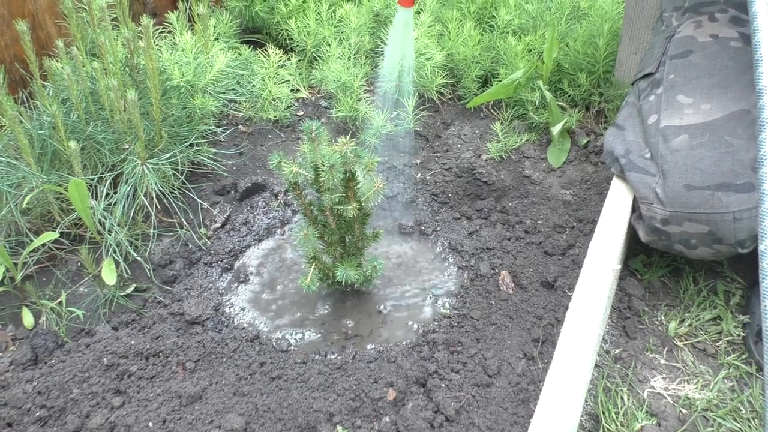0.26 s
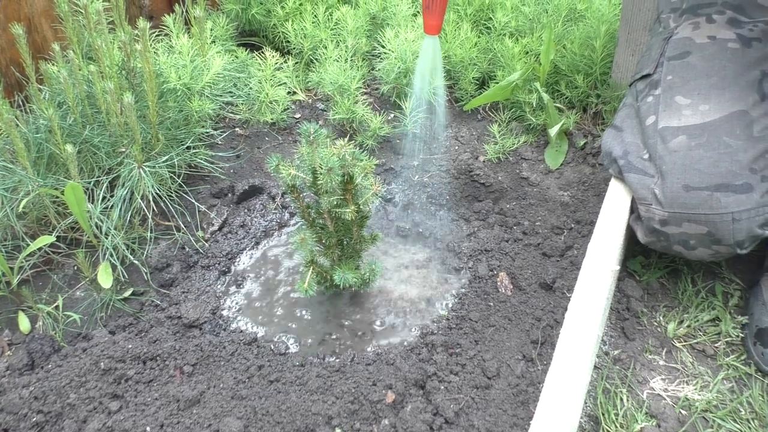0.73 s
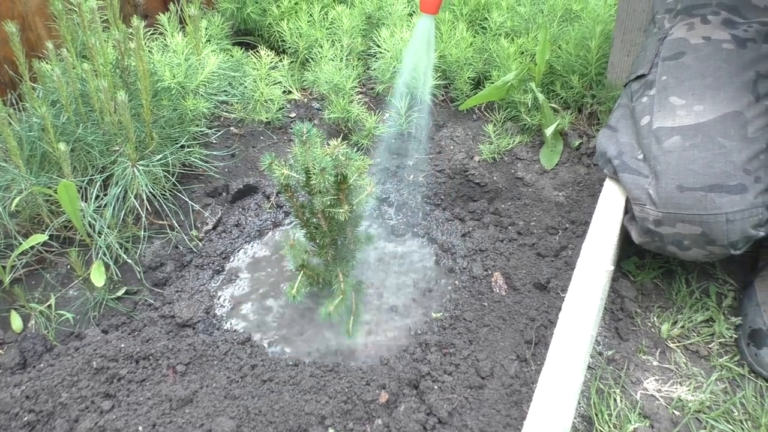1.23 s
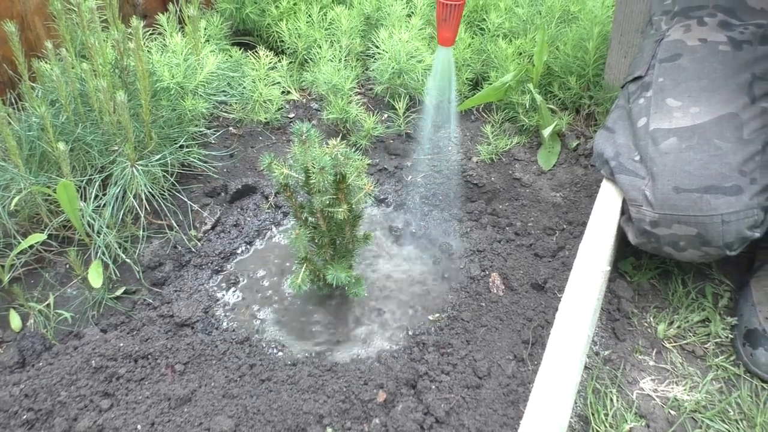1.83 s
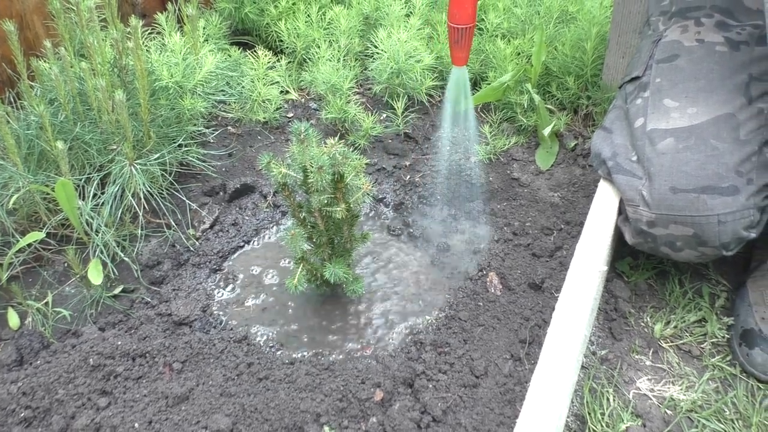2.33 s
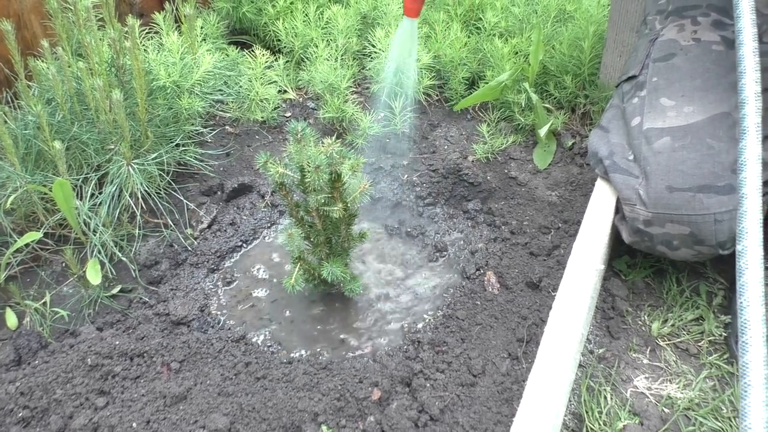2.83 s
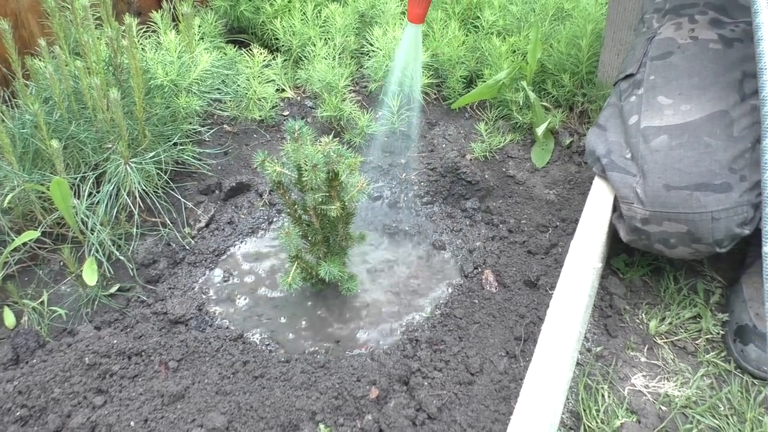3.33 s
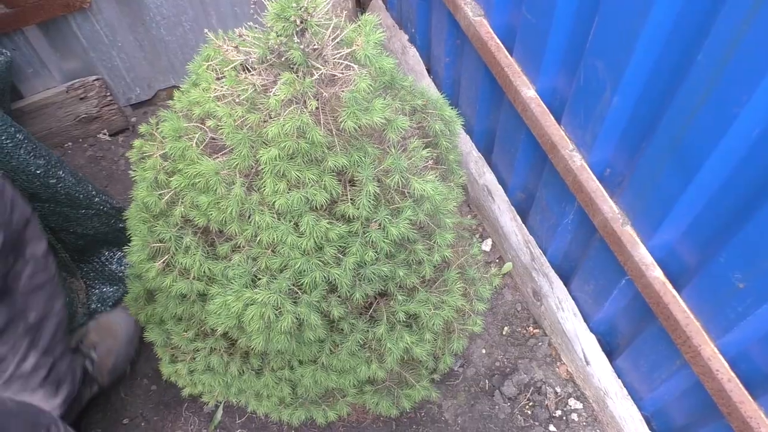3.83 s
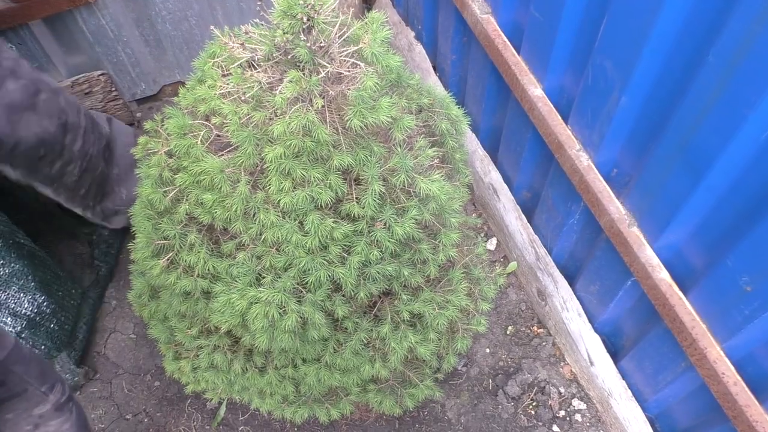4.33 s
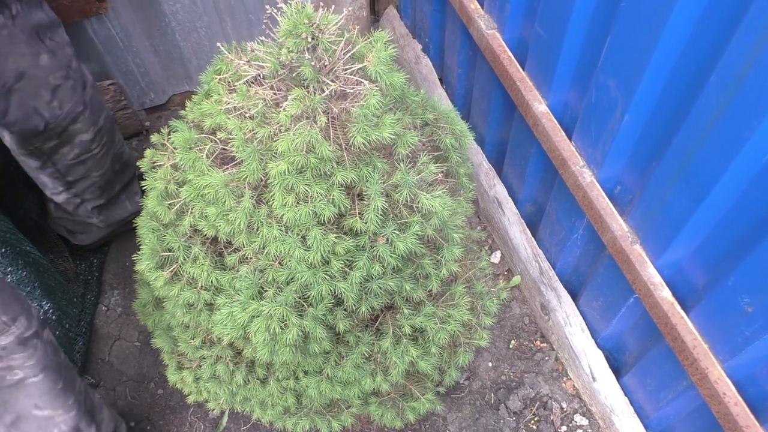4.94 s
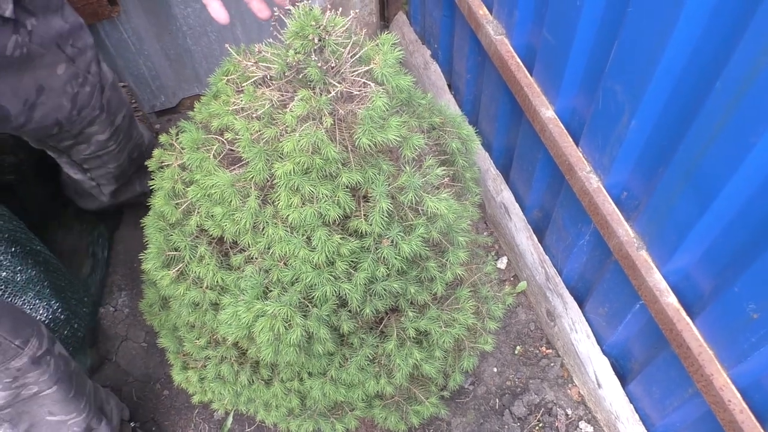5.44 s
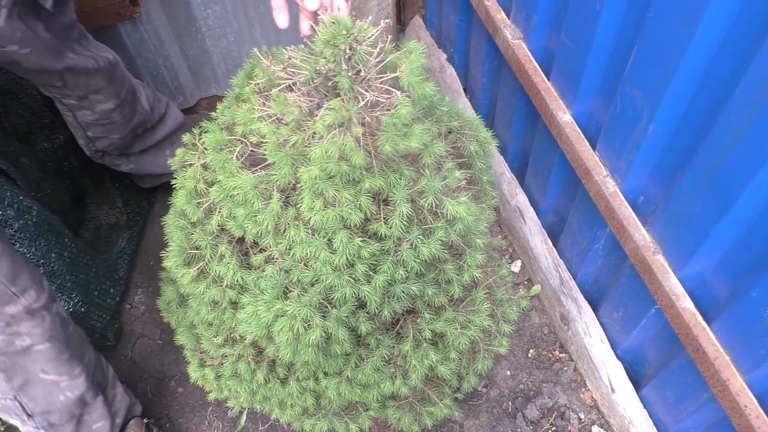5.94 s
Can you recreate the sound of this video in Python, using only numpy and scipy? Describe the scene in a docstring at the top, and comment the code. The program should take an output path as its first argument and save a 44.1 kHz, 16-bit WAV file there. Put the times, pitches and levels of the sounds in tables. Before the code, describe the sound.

Loud close water spray fizzing in a puddle stops dead, giving way to faint garden murmur, dull footfalls, twig snaps and thin bird calls.

```python
"""A hose sprays a seedling: impact noise of fine drops hisses, damped bubbles fizz in a puddle and patter on wet soil.
At 3.5 s this cuts abruptly to a quiet corner by a fence, where a murmur of filtered noise and a far drone swell up.
Soft low thuds are someone's steps round a small spruce; then random grains rustle as cloth, needles and soles,
damped tones snap as twigs, and a small bird whistles gliding sines with a scattered tail.
A second bird, much further off, is heard as two narrow bands of noise."""
import sys
import numpy as np
from scipy import signal
from scipy.fft import rfft, irfft, next_fast_len
from scipy.io import wavfile
from scipy.ndimage import map_coordinates

SR = 44100
rng = np.random.default_rng(int(sys.argv[2]) if len(sys.argv) > 2 else 0)


def int16_out(signal):
    """Quantize to a 16-bit WAV file."""
    q = np.round(np.clip(np.atleast_2d(signal).T, -1, 1) * 32767)
    wavfile.write(sys.argv[1], SR, q.astype(np.int16))


N = 272538
TIME = np.arange(N) / SR   # s
SCENE_CHANGE_S, FADE_S = 3.492, 0.003   # start and time constant of the crossfade

# The wandering spray. Each row: time in seconds, level of the drops' hiss in dB before DROPS_DB,
# aim at the puddle as bubbling against hiss in dB before PUDDLE_FOLLOWS_AIM.
SPRAY = [(0.0, -22.5, -5.5), (0.02, -24, -8), (0.03, -22, -8), (0.08, -20.5, -2.5), (0.09, -23.5, -4),
         (0.42, -21.5, 0), (0.53, -19.5, -2), (0.65, -21, -1), (0.88, -19, -1.5), (0.94, -21.5, -1.5),
         (1.09, -19, -1), (1.15, -20, 0), (1.31, -18, -3), (1.38, -22.5, -1.5), (1.6, -20, -3),
         (1.74, -20, 0), (2.45, -21, -7), (2.5, -20, -3.5), (2.84, -20.5, -0.5), (3.18, -19, -2),
         (3.23, -21, 0), (3.4, -18.5, -1.5), (3.48, -20.5, 0)]
# Patter of the share that falls on bare soil. Each row: time in seconds, level in dB before SOIL_DB.
SOIL_LEVEL = [(0.03, -42.5), (0.04, -43), (0.4, -39), (1.07, -44.5), (1.19, -42.5), (1.4, -48.5),
              (2.09, -41), (3.25, -38), (3.36, -47), (3.48, -44.5)]
DROPS_DB, PUDDLE_DB, SOIL_DB = 2.5, -0.16, 3   # added to the levels above
PUDDLE_FOLLOWS_AIM = 1.47   # dB of bubbles per dB of aim
# Single fat drops. Each row: start in seconds, bubble level in dB, bubble pitch in Hz,
# splash against the bubble in dB.
FAT_DROPS = [(0.9136, -1, 5360, -16), (1.2304, -5, 3170, -16), (1.5450, -5, 9850, -17),
             (2.1299, -6.5, 3260, -17), (2.1387, -2, 8500, -8), (3.1730, -7, 2610, -10)]
# Filter shapes of the water sounds. Each row: frequency in Hz, relative gain in dB.
HISS = [(760, -39.5), (1300, -9), (2670, -4), (3850, -4.5), (4190, -2.5), (4650, -4), (5670, -3),
        (7220, -3), (11300, 1.5), (12800, -5.5), (15000, -5), (15800, -10)]
PUDDLE = [(590, -37), (1000, -12.5), (1270, -8.5), (1940, 0), (4280, -0.5), (5500, -10.5), (7150, -25),
          (12100, -120)]
SOIL = [(160, -33), (280, -21), (310, -13.5), (408, -5.5), (486, 0), (1030, -2.5), (1400, -10.5),
        (1820, -21), (3080, -120)]
HOSE_RUMBLE = [(24, -55), (40, -22), (75, -17), (113, -9.5), (216, -1.5), (273, -3), (312, -3), (380, -5),
               (490, -30), (840, -120)]
HOSE_RUMBLE_DB = -47.5
# Stereo width of the spray. Each row: frequency in Hz, side against middle in dB.
SPRAY_WIDTH = [(60, 0), (99, -13), (160, -4), (270, -10.5), (450, -5.5), (740, -11.5), (1220, -10.5),
               (2010, -17), (3330, -10), (5500, -15), (9080, -24), (15000, -80)]
# Stereo balance of the spray. Each row: frequency in Hz, gain of left over right in dB.
SPRAY_BALANCE = [(60, 1), (99, 4), (160, 7.5), (270, 4.5), (450, 1.5), (740, -3), (1220, -2.5),
                 (2010, -1.5), (3330, -3), (5500, 1), (9080, -2), (15000, -14.5)]
# The low splashing reaches the left side later. Each row: frequency in Hz, phase lead of the left in radians.
SPRAY_LEAD = [(100, -0.2), (260, -0.96), (520, -0.74), (860, -0.14), (1550, 0.16)]

# Soft footfalls and knocks. Each row: start in seconds, level in dB, pitch in Hz.
THUDS = [(3.512, -35, 171), (3.582, -35, 126), (3.697, -29, 185), (3.937, -24.5, 192), (4.035, -27, 177),
         (4.165, -31.5, 205), (4.305, -33, 235), (4.331, -25.5, 176), (4.383, -22, 258),
         (4.430, -29.5, 190), (4.658, -34, 170), (4.678, -35.5, 115), (4.88, -35, 144), (4.949, -38, 95)]
REBOUND_S, REBOUND_DB = 0.0205, -11   # the sole settles after each thud: delay, level against the thud
SHUFFLE_DB, SHUFFLE_S = -23, 0.042   # the weight shifts: level against the step, time to its peak
# Strokes of cloth as the person moves. Each row: peak time in seconds, rise time constant in seconds, level in dB.
SWISHES = [(4.16, 0.14, -42), (4.36, 0.05, -46.5), (4.53, 0.061, -42), (5.06, 0.015, -32.5),
           (5.53, 0.065, -43), (5.64, 0.11, -38.5), (5.81, 0.07, -47), (6.0, 0.017, -47.5),
           (6.09, 0.035, -45)]
# A sleeve brushes through the needles. Each row: peak time in seconds, rise time constant in seconds, level in dB.
BRUSHES = [(4.13, 0.074, -42.5), (5.14, 0.35, -41), (5.64, 0.16, -44.5)]
SWISH_FALL, BRUSH_FALL = 0.52, 1.13   # fall time as a share of the rise
CLOTH_REST_DB, NEEDLES_REST_DB = -58, -54.5   # faint stirring between strokes
# Shoe scuffs. Each row: start in seconds, attack in seconds, time from start to release in seconds, level in dB.
SCUFFS = [(4.48, 0.02, 0.058, -36.5), (5.042, 0.004, 0.027, -29.5)]
SCUFF_RELEASE_S = 0.012
# Twigs and grit snapping. Each row: start in seconds, tone level in dB, pitch in Hz, crack against the tone in dB.
SNAPS = [(4.260, -28, 10500, -14), (4.324, -33, 8500, -6), (5.0728, -13.5, 5160, -13.5),
         (5.3074, -28, 4200, -12), (5.3683, -21, 1770, -25), (5.372, -28, 1890, -22),
         (5.4037, -25, 2490, -15), (5.928, -34, 9000, -5)]
# Filter shapes of the rustling. Each row: frequency in Hz, relative gain in dB.
CLOTH = [(2590, -14), (4400, -2), (4690, -4), (6640, -4), (11300, 0), (15100, -5.5), (15800, -16)]
NEEDLES = [(760, -28), (1300, 0.5), (1440, -1), (1770, 2.5), (2250, 0.5), (2740, 0.5), (7000, -14.5),
           (9100, -52), (15400, -120)]
SCUFF = [(240, -40), (400, -1.5), (812, -6), (1010, 2), (1390, -0.5), (2140, -6), (3550, -8.5),
         (4080, -9.5), (10800, -25), (15800, -21)]

# The bird repeats a falling low note, a high note and a weak afternote. Each row: start of the high note in seconds,
# high note level in dB, low note level in dB, afternote level in dB.
BIRD_CALLS = [(4.143, -49, -58, -57), (4.596, -47.5, -54, -50), (5.064, -38, -46, -47),
              (5.526, -47, -51.5, -46), (5.975, -40, -45, -45.5)]
HIGH_HZ, AFTER_HZ, LOW_HZ = 3875, 3905, 3270   # held pitches
HIGH_S, AFTER_S, LOW_S = 0.066, 0.05, 0.06   # note lengths
AFTER_LAG_S, LOW_LEAD_S = 0.0637, 0.17   # timing against the high note
ONSET_HZ, ONSET_PULL = 3770, 0.6   # each note starts pulled this share of the way towards one pitch
BIRD_LAG_S = 0.000045   # the song reaches the right side later
# The far bird, blurred by echoes. Each row: start in seconds, length in seconds, level in dB before its octave.
FAR_BIRD = [(4.76, 0.13, -55), (5.08, 0.24, -51.5)]
FAR_BIRD_HZ, FAR_OCTAVE_DB = 2730, -6   # pitch, level of the octave against it
# A far engine's drone, before the murmur's swell. Each row: centre in Hz, bandwidth in Hz, level in dB.
DRONE = [(86, 5, -52.5), (208, 20, -50), (410, 51, -55.5)]
# Filter shape of the murmur. Each row: frequency in Hz, relative gain in dB.
MURMUR = [(24, -36), (40, -23), (75, -4.5), (209, 0), (327, -2.5), (400, 2.5), (676, -3.5), (1290, 0),
          (2190, -12), (2740, -12.5), (3030, -14), (3350, -13.5), (4520, -18.5), (5390, -19.5),
          (15800, -25)]
MURMUR_DB = -35.0   # once settled
MURMUR_START_DB, MURMUR_SETTLE_S = -10.5, 1.52   # start against the settled level, time constant
# Stereo width of the quiet corner. Each row: frequency in Hz, side against middle in dB.
GARDEN_WIDTH = [(60, -6), (110, -12), (200, -7.5), (380, -8.5), (700, -9.5), (1290, -6), (2380, -7),
                (4400, -5.5), (8120, -22), (15000, -24)]
# Stereo balance of the quiet corner. Each row: frequency in Hz, gain of left over right in dB.
GARDEN_BALANCE = [(60, -1), (110, 1), (200, 1), (380, -1.5), (700, -4.5), (1290, -5), (2380, -1.5),
                  (4400, -0.5), (8120, 0), (15000, 4)]

MERGE_HZ, CUTOFF_HZ = 6900, 15850   # stereo difference and whole sound end here
PEAK_LIMIT = 1.1   # ceiling of the rounded peaks


def hose():
    """Superposition: the spray wanders between puddle and soil, and one flutter modulates hiss and bubbles together."""
    drops_db, aim_db = in_time(SPRAY)
    soil_db, = in_time(SOIL_LEVEL)
    puddle_db = drops_db + PUDDLE_FOLLOWS_AIM * aim_db
    flutter = drift(45)
    drops = [fine_drops(per_s=7000, size_db=3.0, decay_s=0.00078, burst_db=2.5, steady_db=-4.5)
             for _ in range(2)]
    hiss = spread(drops, HISS, SPRAY_WIDTH)
    # most bubbles burst at once, a few ring on as tiny plinks
    fizz = [bubbles(per_s=8000, size_db=2.5, low_hz=877, high_hz=7270, cycles=7.8) for _ in range(2)]
    plinks = [bubbles(per_s=450, size_db=2.0, low_hz=1080, high_hz=4200, cycles=50, count=40)
              for _ in range(2)]
    puddle = spread(np.array(fizz) + from_db(-9.5) * np.array(plinks), PUDDLE, SPRAY_WIDTH)
    patter = [bubbles(per_s=1800, size_db=2.0, low_hz=255, high_hz=1636, cycles=13.5) for _ in range(2)]
    soil = spread(patter, SOIL, SPRAY_WIDTH)
    rumble = from_db(HOSE_RUMBLE_DB) * spread(rng.standard_normal((2, N)), HOSE_RUMBLE, SPRAY_WIDTH)

    water = hiss * from_db(drops_db + DROPS_DB + 0.28 * flutter)
    water += puddle * from_db(puddle_db + PUDDLE_DB + 0.62 * flutter + 0.11 * drift(60))
    water += soil * from_db(soil_db + SOIL_DB + 0.14 * flutter)
    water += pings(FAT_DROPS, cycles=18, crack_s=.001)
    # drops are too small for bass
    water = signal.sosfilt(signal.butter(2, 250, "high", fs=SR, output="sos"), water)
    return turned(placed(water + rumble, SPRAY_BALANCE), SPRAY_LEAD)


def fine_drops(per_s, size_db, decay_s, burst_db, steady_db):
    """Impact noise: each drop ticks, with a short burst of noise that rises and falls; steady noise fills in beneath."""
    ticks = grains(per_s, size_db)
    r = np.exp(-1 / (decay_s * SR))
    burst_power = np.abs(signal.lfilter([1], [1, -2 * r, r * r], ticks ** 2))
    bursts = np.sqrt(burst_power) * rng.standard_normal(N)
    steady = rng.standard_normal(N)
    return rms_one(rms_one(ticks) + from_db(burst_db) * rms_one(bursts) + from_db(steady_db) * steady)


def bubbles(per_s, size_db, low_hz, high_hz, cycles, count=28):
    """Damped resonance: trapped bubbles of many sizes each ring for a few cycles, weighted by pitch."""
    born = grains(per_s, size_db)
    dealt = rng.integers(0, count, N)   # which size each bubble has
    pitches = np.geomspace(low_hz, high_hz, count)
    return rms_one(sum(hz * ring(born * (dealt == k), hz, cycles / hz) for k, hz in enumerate(pitches)))


def footfalls(swell_cycles, grit_db, grit_s):
    """Heavy damping: soft ground answers a step with a few low cycles and a weak rebound, in a crunch and shuffle."""
    out = np.zeros(N)
    crunch = band_noise(80, 380)
    shuffle = band_noise(70, 220)
    for s, db, hz in THUDS:
        thud, rebound = (swell(at, swell_cycles / hz) * np.sin(2 * np.pi * hz * (TIME - at))
                         for at in (s, s + REBOUND_S))
        ground = from_db(grit_db) * crunch * swell(s - grit_s, grit_s)
        ground += from_db(SHUFFLE_DB) * shuffle * swell(s, SHUFFLE_S)
        out += from_db(db) * (thud + from_db(REBOUND_DB) * rebound + ground)
    return out


def clothes():
    """Friction noise: dense fibre impacts swish with each stroke of the cloth."""
    swishing = np.hypot(strokes(SWISHES, SWISH_FALL), from_db(CLOTH_REST_DB)) * from_db(0.9 * drift(50))
    return swishing * rustle(11000, 3.0, CLOTH)


def needles():
    """Sparse impacts: needles crackle one by one as the sleeve brushes them."""
    brushing = np.hypot(strokes(BRUSHES, BRUSH_FALL), from_db(NEEDLES_REST_DB))
    return brushing * rustle(3500, 2.5, NEEDLES)


def scuffs():
    """Sliding friction: grains sound under the pressure of a sole, which trembles quickly."""
    pressure = np.zeros(N)
    for s, attack, length, db in SCUFFS:
        release = np.exp(-np.maximum(TIME - s - length, 0) / SCUFF_RELEASE_S)
        pressure += from_db(db) * np.clip((TIME - s) / attack, 0, 1) * release
    return pressure * from_db(2.1 * drift(270)) * rustle(7000, 2.0, SCUFF)


def bird(slide_s, waver_hz, echo_db, echo_s):
    """Frequency glide: thin whistles slide on to a held pitch, with a tail scattered by fences and trees."""
    song = np.zeros(N)
    waver = waver_hz * drift(120)
    for call_s, high_db, low_db, after_db in BIRD_CALLS:
        notes = [(call_s - LOW_LEAD_S, LOW_S, LOW_HZ, low_db),
                 (call_s, HIGH_S, HIGH_HZ, high_db),
                 (call_s + AFTER_LAG_S, AFTER_S, AFTER_HZ, after_db)]
        for s, length, held_hz, db in notes:
            slide = np.exp(-np.maximum(TIME - s, 0) / slide_s)
            hz = held_hz + ONSET_PULL * (ONSET_HZ - held_hz) * slide + waver
            whistle = np.sqrt(2) * np.sin(2 * np.pi * np.cumsum(hz) / SR)
            song += from_db(db) * burst(s, length, edge=0.01) * whistle
    tail = rng.standard_normal((2, SR // 2)) * np.exp(-TIME[:SR // 2] / echo_s)
    echoes = signal.fftconvolve(song[None], tail / np.linalg.norm(tail[0]), axes=1)[:, :N]
    return np.array([song, np.interp(TIME - BIRD_LAG_S, TIME, song)]) + from_db(echo_db) * echoes


def far_bird(width_hz):
    """Multipath smearing: distance blurs each whistle and its octave into narrow bands."""
    tone, octave = (drift(width_hz) * np.sqrt(2) * np.sin(2 * np.pi * k * FAR_BIRD_HZ * TIME) for k in (1, 2))
    calls = sum(from_db(db) * burst(s, length, edge=0.037) for s, length, db in FAR_BIRD)
    return (tone + from_db(FAR_OCTAVE_DB) * octave) * calls


def drone():
    """Resonance: noise drives a few narrow modes, as of a far engine."""
    return sum(from_db(db) * rms_one(ring(rng.standard_normal(N), hz, np.log(1000) / (np.pi * width)))
               for hz, width, db in DRONE)


def murmur():
    """Sum of many distant sources: Gaussian noise with a fixed spectrum."""
    return from_db(MURMUR_DB) * spread(rng.standard_normal((2, N)), MURMUR, GARDEN_WIDTH)


def garden():
    """Superposition: a moving person and two birds over a murmur and drone that swell together."""
    person = footfalls(swell_cycles=0.88, grit_db=-19, grit_s=0.032) + clothes() + needles() + scuffs()
    person += pings(SNAPS, cycles=20, crack_s=0.0072)
    song = bird(slide_s=.015, waver_hz=15, echo_db=-10, echo_s=.09) + far_bird(width_hz=400)
    settling = np.exp(-np.maximum(TIME - SCENE_CHANGE_S, 0) / MURMUR_SETTLE_S)
    background = from_db(MURMUR_START_DB * settling) * (murmur() + drone())
    return placed(person + song + background, GARDEN_BALANCE)


def pings(rows, cycles, crack_s):
    """Damped oscillation: short decaying tones, each with a bright crack of noise at its start."""
    out = np.zeros(N)
    band = signal.butter(2, [1500, 12000], "band", fs=SR, output="sos")
    bright = signal.sosfilt(band, rng.standard_normal(N))
    for s, db, hz, crack_db in rows:
        age = np.maximum(TIME - s, 0)
        tone = np.sin(2 * np.pi * hz * age) * np.exp(-np.log(1000) * age * hz / cycles)   # -60 dB after `cycles`
        crack = from_db(crack_db) * bright * np.exp(-age / crack_s) * (age > 0)
        out += from_db(db) * (tone + crack)
    return out


def ring(clicks, hz, t60):
    """Two-pole resonator: a unit click sets a sine of about height 1 ringing, down 60 dB after t60 seconds."""
    r = from_db(-60 / (t60 * SR))
    w = 2 * np.pi * hz / SR
    return signal.lfilter([0, np.sin(w)], [1, -2 * r * np.cos(w), r * r], clicks + 1e-18)


def grains(per_s, size_db):
    """Poisson impacts: many small, a few large."""
    sizes = from_db(size_db * np.minimum(rng.exponential(1, N), 6))
    return sizes * rng.choice([-1, 1], N) * (rng.random(N) < per_s / SR)


def rustle(per_s, size_db, spectrum):
    """Granular noise: independent impacts in middle and sides, coloured."""
    return spread([grains(per_s, size_db) for _ in range(2)], spectrum, GARDEN_WIDTH)


def band_noise(low_hz, high_hz):
    """Band-limited noise of rms 1."""
    band = signal.butter(2, [low_hz, high_hz], "band", fs=SR, output="sos")
    return rms_one(signal.sosfilt(band, rng.standard_normal(N)))


def strokes(rows, fall):
    """Incoherent addition: each stroke grows up to its peak, then dies away; their powers add."""
    power = np.zeros(N)
    for s, rise, db in rows:
        distance = np.maximum(s - TIME, (TIME - s) / fall) / rise
        power += (from_db(db) * np.exp(-distance)) ** 2
    return np.sqrt(power)


def swell(s, rise):
    """Critically damped envelope: a smooth rise to 1 after `rise` seconds, and a slower fall."""
    age = np.maximum(TIME - s, 0) / rise
    return age ** 2 * np.exp(2 - 2 * age)


def burst(s, length, edge):
    """Gating: a window with soft edges."""
    return np.clip((TIME - s) / edge + .5, 0, 1) * np.clip((s + length - TIME) / edge + .5, 0, 1)


def drift(rate):
    """Band-limited chance: a smooth curve of rms 1 that changes about `rate` times a second."""
    knots = rng.standard_normal(N // 40)
    return rms_one(map_coordinates(knots, [TIME * rate + 2], order=3, mode="wrap"))


def in_time(rows):
    """Linear interpolation: each column of a curve at every sample."""
    s, *columns = np.transpose(rows)
    return [np.interp(TIME, s, c) for c in columns]


def coloured(x, spectrum):
    """Minimum-phase filtering: the folded cepstrum gives a causal filter with the given (Hz, dB) shape."""
    size = 2 * next_fast_len(N // 2 + SR // 4)
    hz, db = np.transpose(spectrum)
    shape = np.interp(np.log(np.arange(size // 2 + 1) * SR / size + 1), np.log(hz), db)
    cepstrum = irfft(np.log(from_db(shape)))
    cepstrum[1:size // 2] *= 2
    cepstrum[size // 2 + 1:] = 0
    return irfft(rfft(x, size) * np.exp(rfft(cepstrum)))[..., :N]


def spread(pair, spectrum, width):
    """Decorrelation: two unrelated signals become middle and sides of one coloured stereo sound of rms 1."""
    mid, side = coloured(np.array(pair), spectrum)
    return rms_one(mid + coloured(side, width) * [[1], [-1]])


def placed(x, balance):
    """Level difference: lean a stereo sound to one side, band by band."""
    return np.array([coloured(channel, [(hz, sign * db / 2) for hz, db in balance])
                     for channel, sign in zip(x, (1, -1))])


def turned(x, lead):
    """Phase difference: shift the two sides against each other, band by band."""
    hz, radians = np.transpose(lead)
    size = 2 * next_fast_len(N // 2 + SR // 8)
    angle = np.interp(np.arange(size // 2 + 1) * SR / size, hz, radians)
    return irfft(rfft(x, size) * np.exp(.5j * angle * [[1], [-1]]))[:, :N]


def from_db(db):
    """Logarithmic level: decibels to gain."""
    return 10 ** (np.asarray(db) / 20)


def rms_one(x):
    """Normalisation: scale to rms 1."""
    return x / np.sqrt(np.mean(x ** 2) + 1e-20)


def scene():
    """Crossfade: an abrupt cut from the hose to the quiet corner, softened over a few milliseconds."""
    before = np.exp(-np.maximum(TIME - SCENE_CHANGE_S, 0) / FADE_S)
    return before * hose() + (1 - before) * garden()


def record(dry):
    """Reception: deepest bass is lost, treble merges to mono, peaks are rounded and the top is cut steeply."""
    left, right = signal.sosfilt(signal.butter(2, 30, "high", fs=SR, output="sos"), dry)
    mid = (left + right) / 2
    side = signal.sosfiltfilt(signal.butter(3, MERGE_HZ, fs=SR, output="sos"), (left - right) / 2)
    rounded = PEAK_LIMIT * np.tanh((mid + side * [[1], [-1]]) / PEAK_LIMIT)
    return signal.sosfilt(signal.ellip(12, .1, 90, CUTOFF_HZ, fs=SR, output="sos"), rounded)


dry = scene()
out = record(dry)
int16_out(out)
```